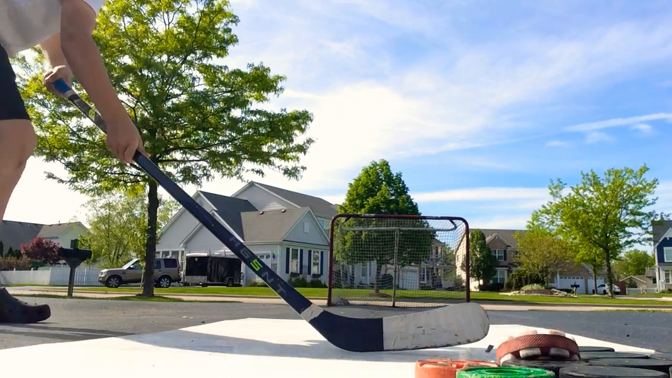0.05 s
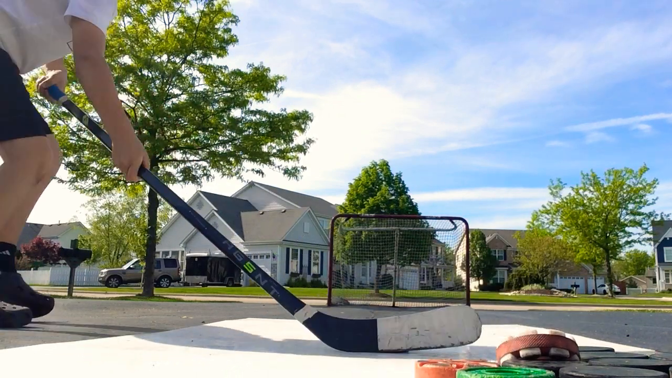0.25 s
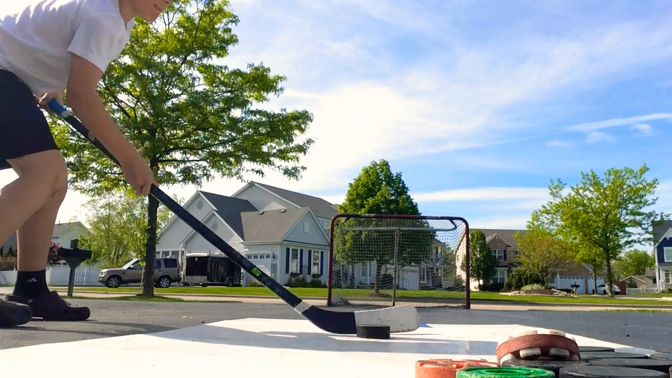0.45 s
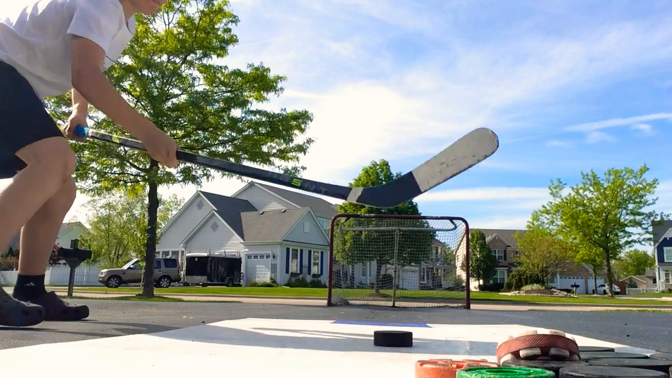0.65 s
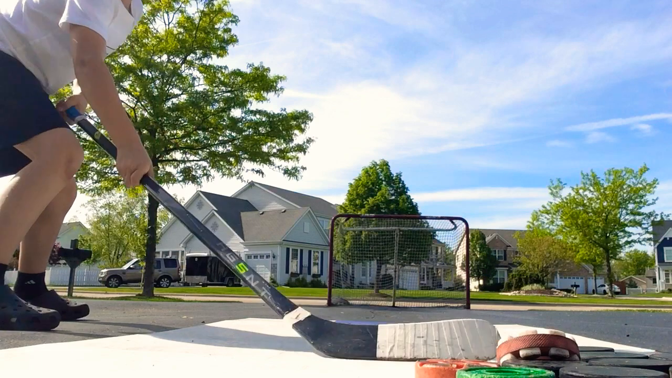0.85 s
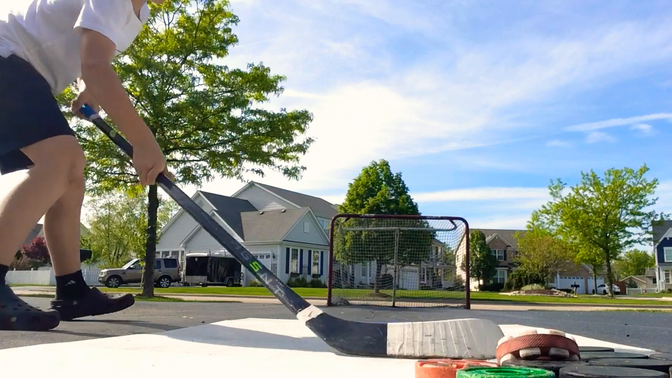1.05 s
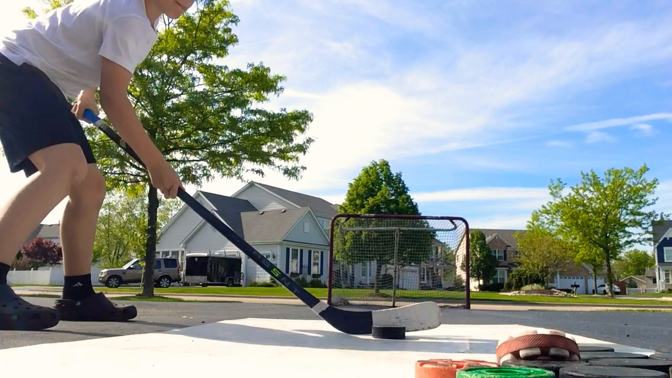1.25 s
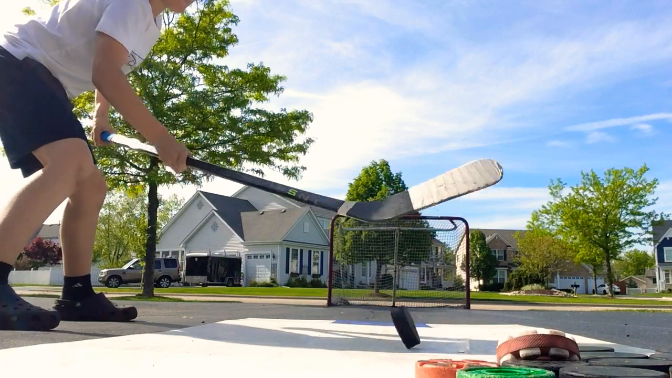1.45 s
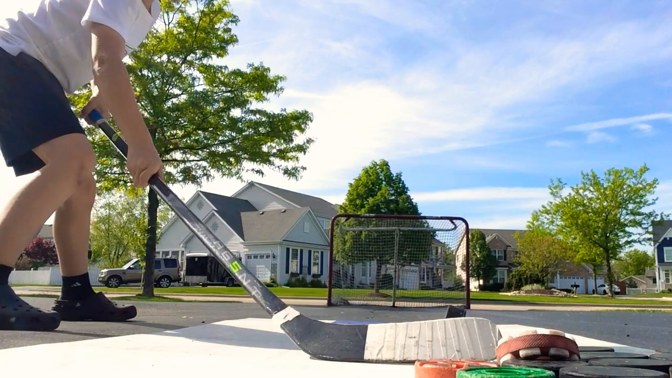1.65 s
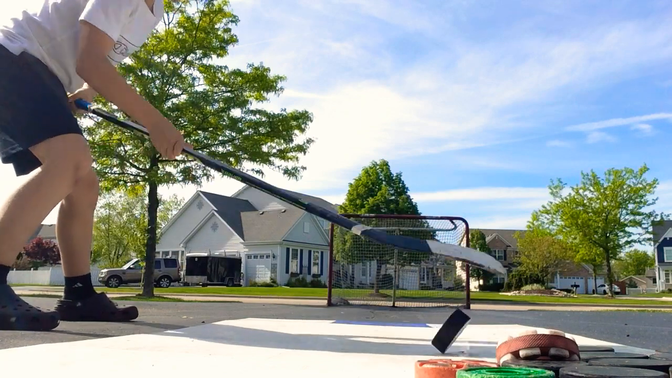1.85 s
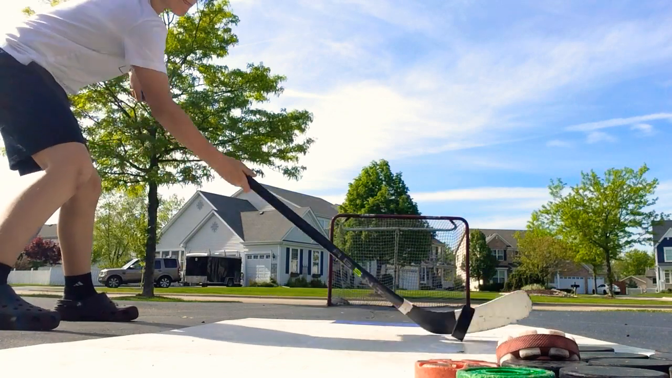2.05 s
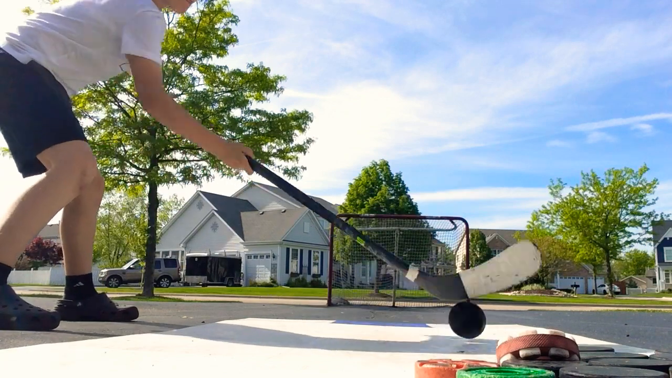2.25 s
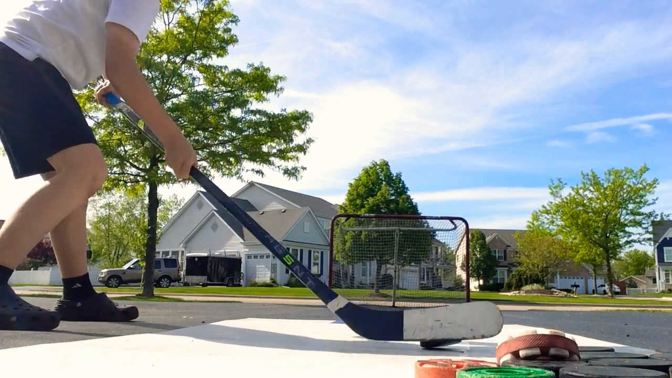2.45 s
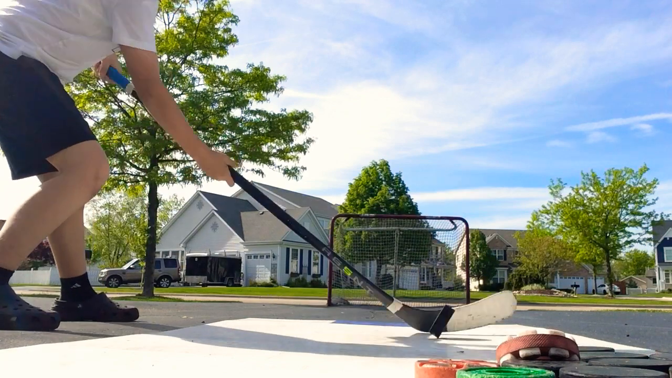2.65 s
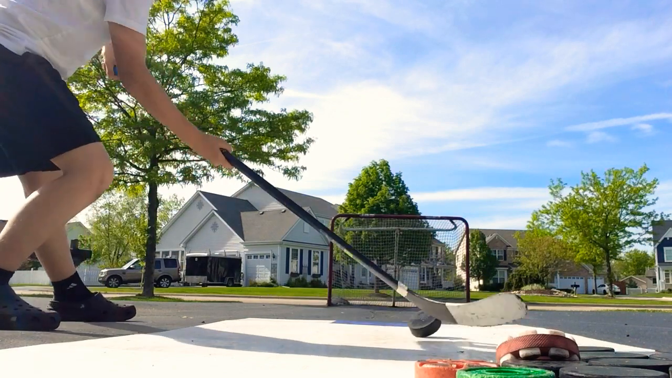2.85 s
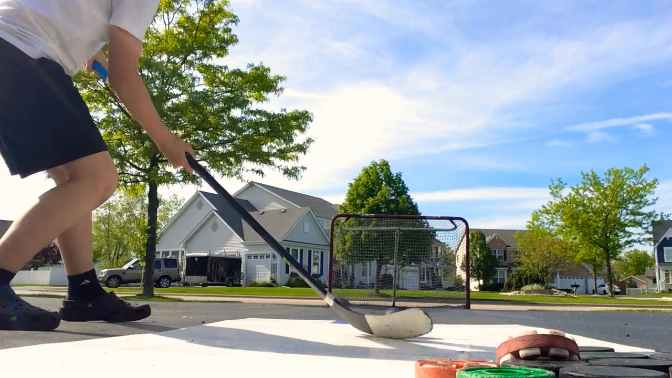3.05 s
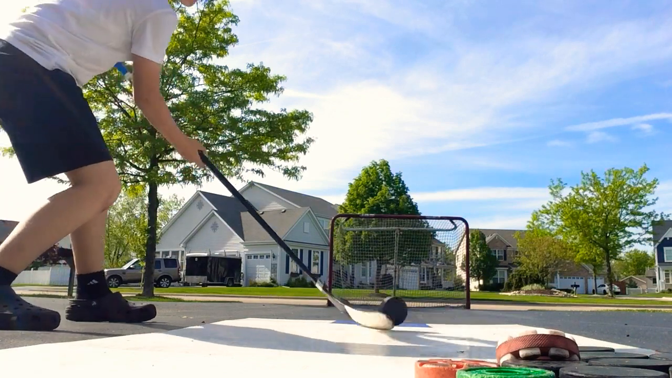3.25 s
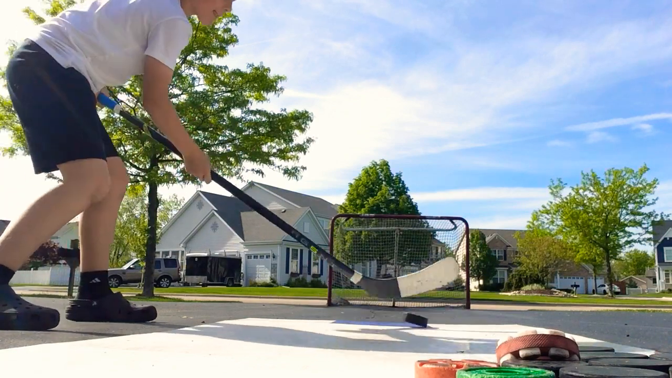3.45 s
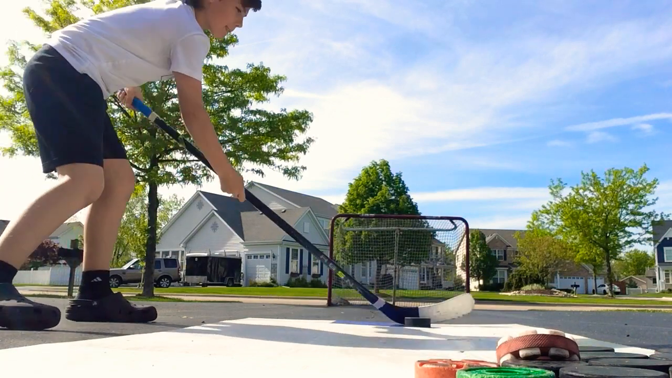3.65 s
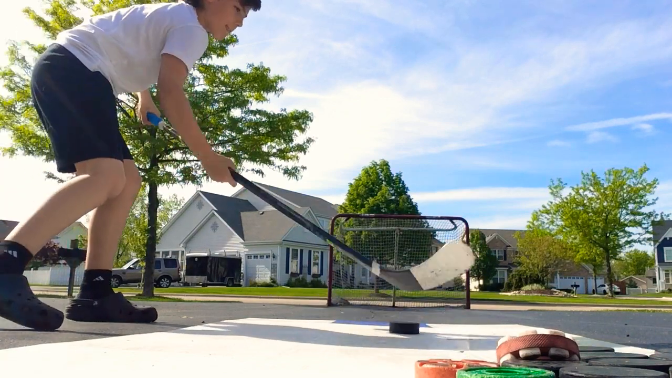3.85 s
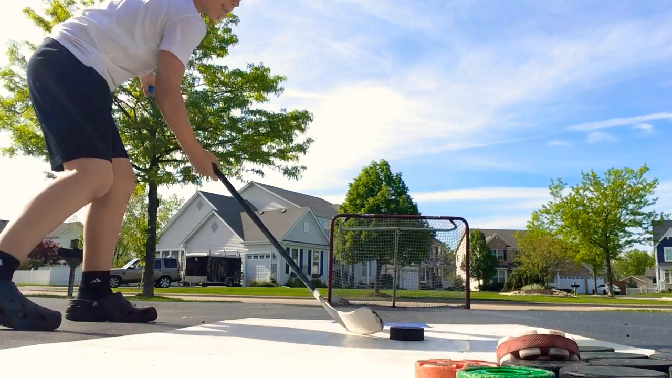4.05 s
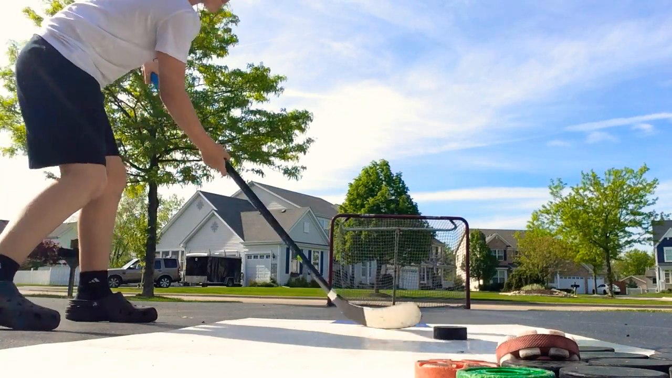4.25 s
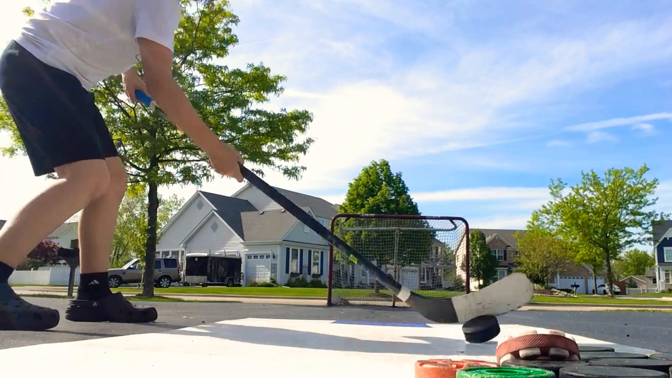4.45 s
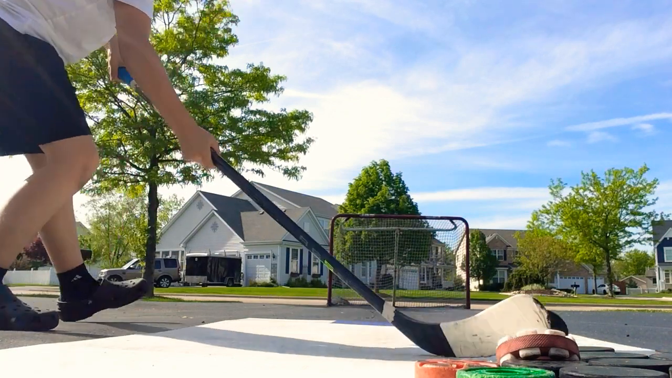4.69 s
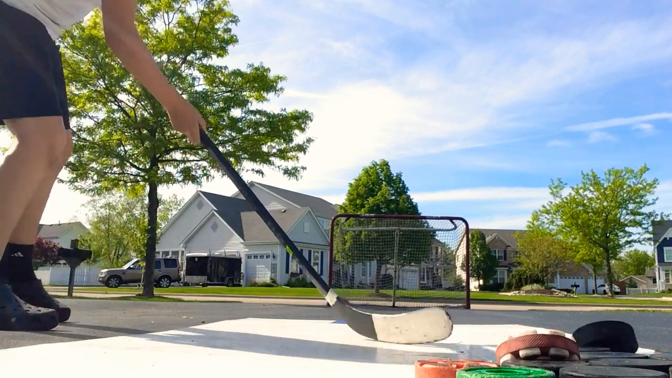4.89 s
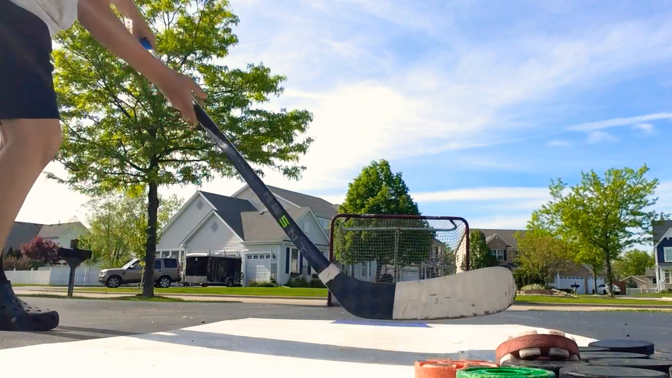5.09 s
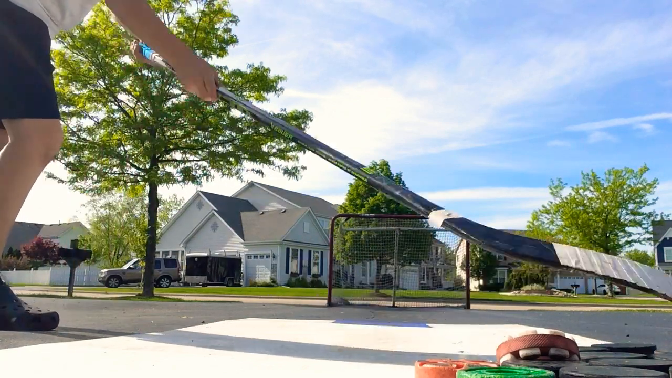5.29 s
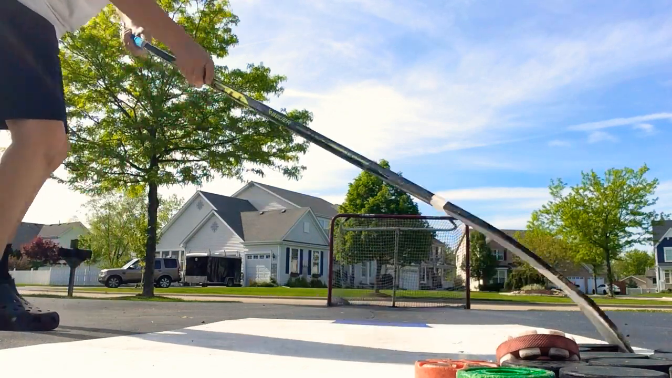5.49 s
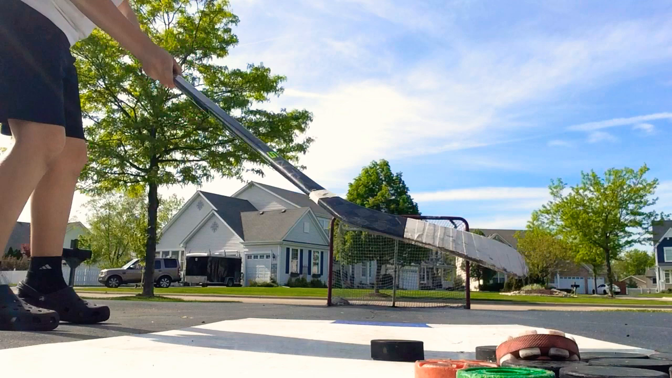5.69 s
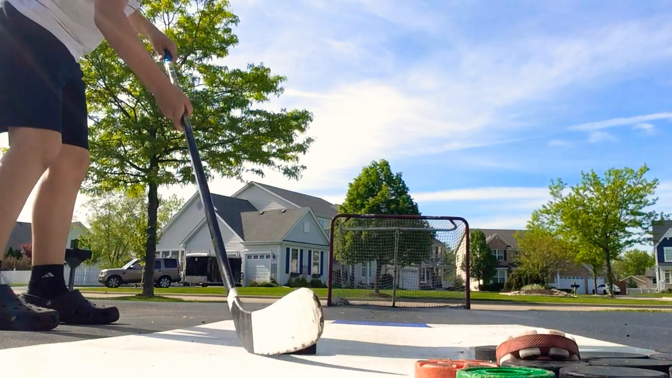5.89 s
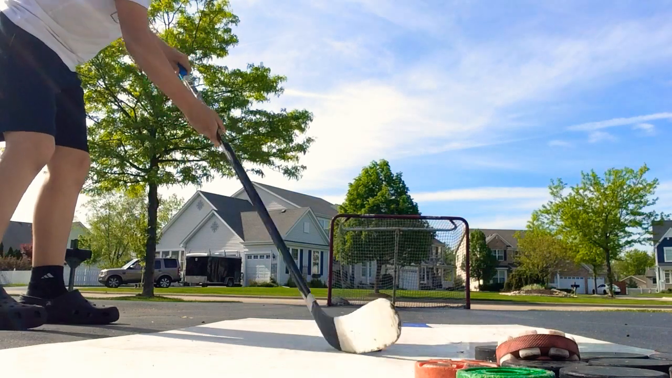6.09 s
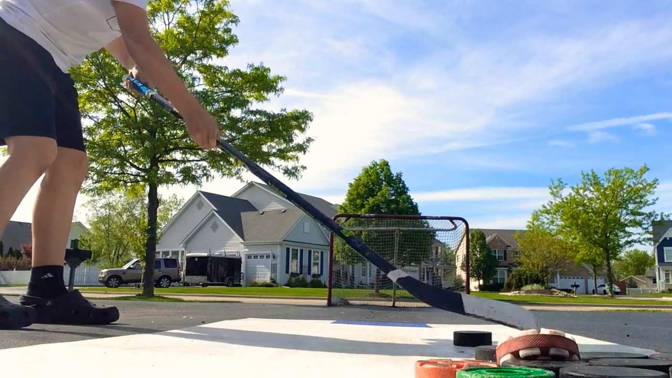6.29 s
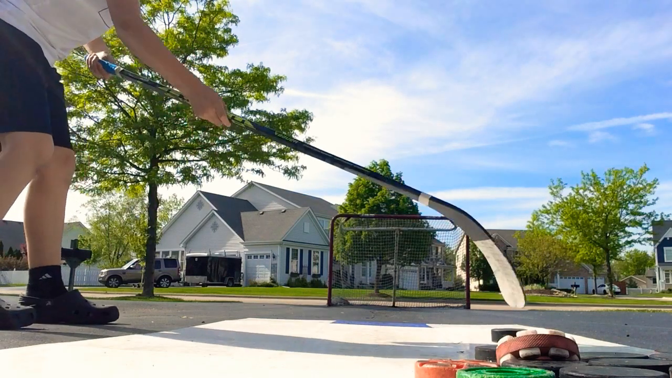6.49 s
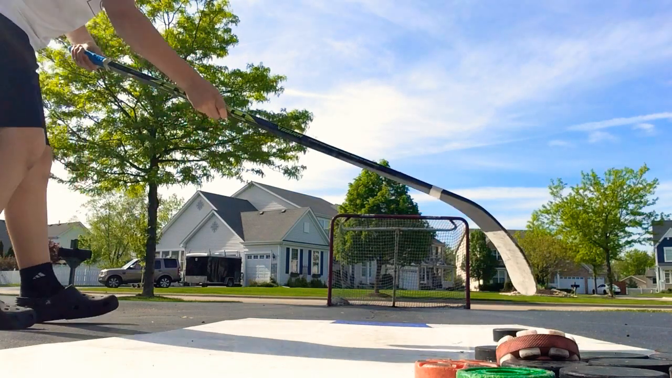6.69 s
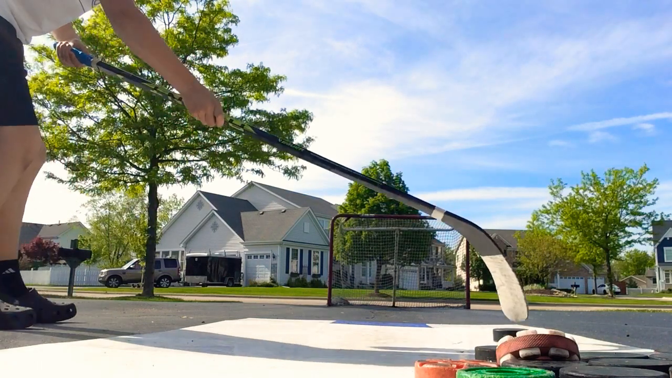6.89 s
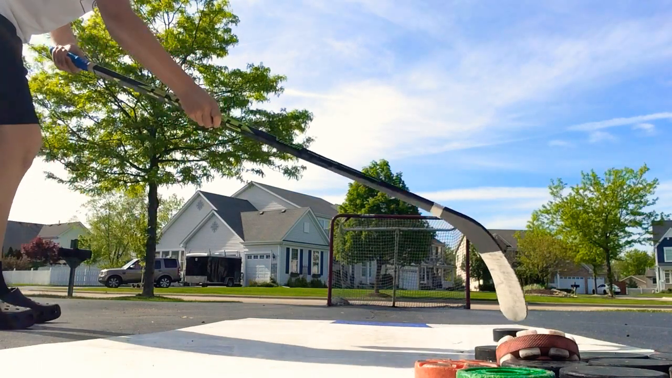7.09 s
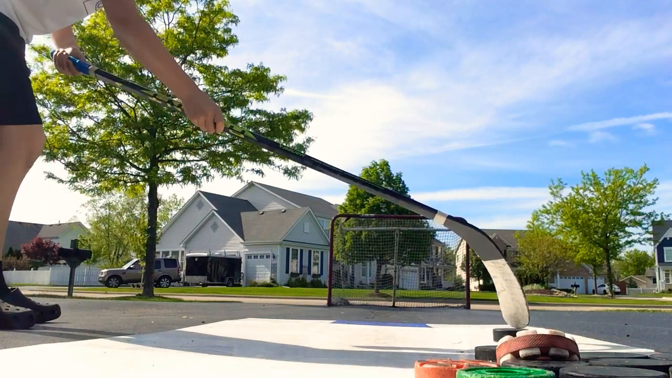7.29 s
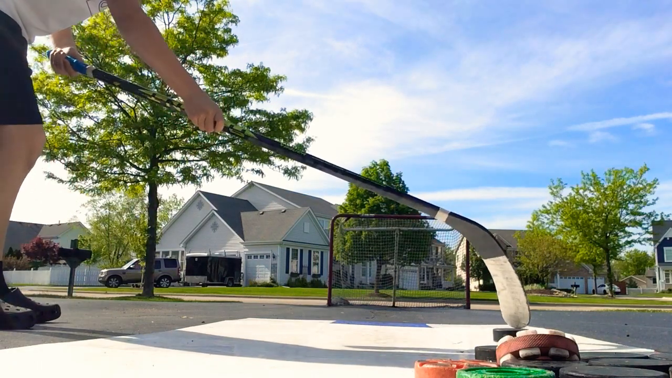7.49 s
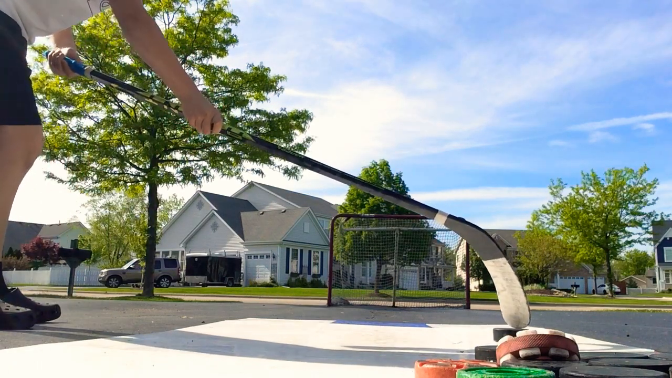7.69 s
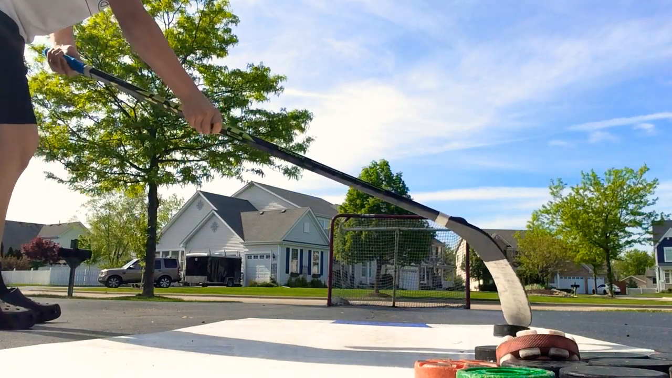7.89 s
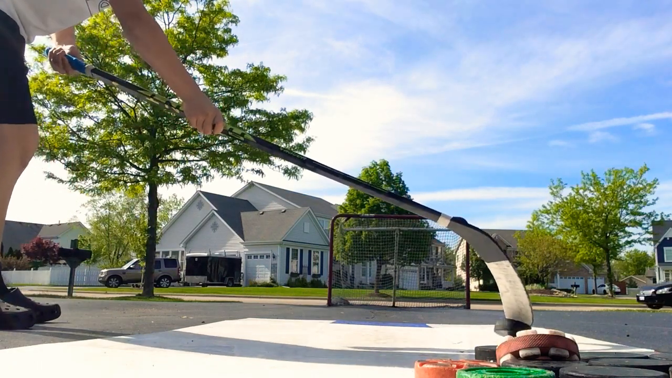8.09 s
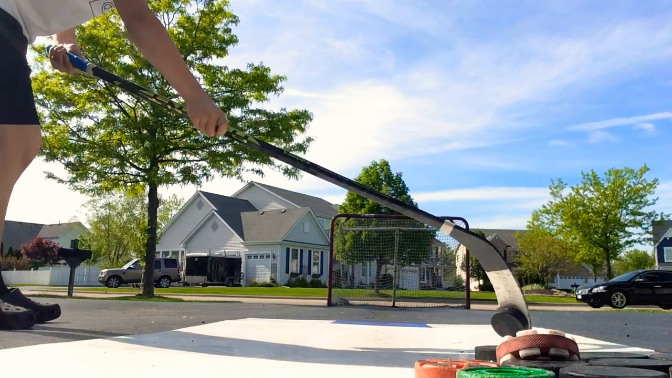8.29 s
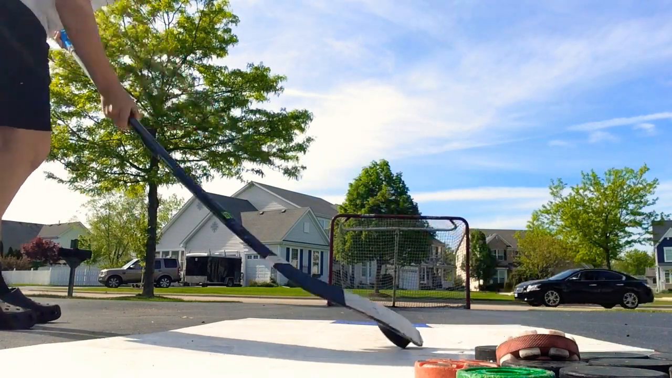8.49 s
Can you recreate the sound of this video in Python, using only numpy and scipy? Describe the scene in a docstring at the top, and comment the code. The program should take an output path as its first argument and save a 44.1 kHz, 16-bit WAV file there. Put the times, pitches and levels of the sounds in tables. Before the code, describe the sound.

Close to the microphone, a taped stick blade raps and flips a rubber puck on a plastic pad over asphalt. Hard hollow clacks, softer thumps and brief gritty scrapes come in quick uneven clusters for six seconds, then thin out. A small shoe squeak follows, then mostly quiet street hum with a tiny bird chirp, and a closing tap as traffic swells.

```python
"""Stick blade and puck on a pad

A stick blade knocks, flips and drags a puck on a plastic pad lying on asphalt, in a quiet street.
Each contact rings pad and blade modes with rattling forces and adds a noise crack; slides are grainy noise.
A shoe squeaks once (tones with uneven slips) and a far bird chirps (falling sines).
Low rumble swells and far traffic, growing towards the end, are shaped noise."""
import sys
import numpy as np
from scipy import signal
from scipy.fft import rfft, irfft
from scipy.io import wavfile

SR = 44100
rng = np.random.default_rng(int(sys.argv[2]) if len(sys.argv) > 2 else 0)


def ratio(d):
    """dB to gain"""
    e = np.asarray(d, float) / 20
    return 10 ** e


def store_wav(level_fs):
    """Save 16-bit WAV to argv[1]."""
    pcm = np.round(np.clip(np.atleast_2d(level_fs), -1, 1) * 32767)
    wavfile.write(sys.argv[1], SR, pcm.T.astype(np.int16))


N = 376613   # samples

# Blade and puck contacts, before the pad's bass cut. Each row: time in seconds, pad thump peak in dB,
# blade knock peak in dB, edge crack peak in dB, pitch centre of the struck spot in Hz.
CONTACTS = [(.033, -21, -51.5, -34, 507), (.106, -3, -5.5, -3.5, 480), (0.121, -14.5, -19.5, -31, 450),
            (.183, -32.5, -39, -45, 497), (0.313, -21, -30, -63, 530), (.331, -24.5, -54, -70, 420),
            (.479, -31.5, -43, -45, 444), (0.537, -7.5, -28, -28, 425), (.554, -9, -10.5, -4.5, 510),
            (0.587, -8, -14.5, -15.5, 556), (.61, -24, -41, -43, 444), (.646, -17.5, -28.5, -27.5, 524),
            (0.736, -14.5, -37.5, -19.5, 453), (.806, -39, -52, -34, 500), (.849, -25.5, -41, -59.5, 570),
            (.899, -9.5, -17.5, -2.5, 480), (0.908, -12.5, -11.5, -11, 470), (1.063, -21, -33.5, -65, 490),
            (1.199, -24, -32.5, -45, 565), (1.23, -21.5, -45, -48.5, 454), (1.267, -18.5, -39, -33.5, 454),
            (1.342, -3, -7, -3, 470), (1.353, -18, -18.5, -14.5, 464), (1.384, -9, -28, -17, 427),
            (1.415, -40, -46, -30, 510), (1.526, -28, -35.5, -54, 580), (1.535, -19, -57.5, -35.5, 545),
            (1.593, -24.5, -48.5, -62, 430), (1.634, -16.5, -27, -28, 580), (1.69, -8.5, -9.5, -7, 596),
            (1.7, -9, -10.5, -6.5, 547), (1.732, -13, -30.5, -25.5, 560), (1.766, -26, -29.5, -35.5, 480),
            (1.781, -30, -35, -50, 457), (1.85, -28.5, -38.5, -37, 377), (2.025, -26.5, -52, -68, 530),
            (2.115, -6.5, -20, -9.5, 490), (2.126, -16.5, -12, -34, 450), (2.212, -25.5, -12, -14, 450),
            (2.222, -20, -39, -51, 415), (2.25, -49, -47, -31.5, 403), (2.27, -26.5, -35, -57, 460),
            (2.325, -13.5, -18.5, -25, 444), (2.478, -0.5, -8.5, -5.5, 480),
            (2.542, -18.5, -28.5, -42, 607), (2.592, -31, -53, -60, 340), (2.668, -29.5, -60, -76, 417),
            (2.764, -6, -11.5, -3, 560), (2.78, -37.5, -30, -19.5, 510), (2.829, -32, -48, -22, 436),
            (2.857, -27.5, -47, -48, 430), (2.889, -35.5, -55, -58, 545), (2.906, -40, -43, -38, 500),
            (2.957, -14, -24.5, -27.5, 525), (3.036, -7, -11, -15.5, 495), (3.199, -21, -30, -49, 505),
            (3.207, -17, -16, -21, 480), (3.394, -29, -55, -74.5, 498), (3.441, -4, -9.5, -10.5, 452),
            (3.478, -43, -52, -46, 534), (3.522, -27.5, -46, -48, 480), (3.618, -17.5, -32.5, -54, 480),
            (3.676, -28, -50.5, -66, 486), (3.752, -2.5, -10, -8, 540), (3.764, -22, -28, -16, 595),
            (3.801, -22.5, -48, -45, 440), (3.811, -33, -45, -24, 480), (3.83, -15.5, -24, -20.5, 580),
            (3.84, -21.5, -48, -19, 480), (3.894, -25, -32, -51, 450), (3.925, -25.5, -39, -55, 420),
            (4.042, -4.5, -11, -6, 546), (4.077, -40, -33, -39, 430), (4.101, -9.5, -12.5, -15, 444),
            (4.116, -20, -48, -41, 470), (4.149, -18, -39, -48, 480), (4.188, -22, -50, -30.5, 796),
            (4.474, -15.5, -9, -24, 405), (4.501, -15, -29, -45, 383), (4.686, -34.5, -41, -63, 403),
            (4.696, -16.5, -36, -44, 420), (4.709, -8.5, -6, -4.5, 594), (4.756, -27, -29, -22.5, 497),
            (4.762, -20.5, -29, -24, 454), (4.876, -23, -34, -44, 480), (4.891, -16, -23.5, -53, 520),
            (4.95, -31, -48, -62, 510), (5.014, -29, -45, -40, 430), (5.201, -22, -34, -52, 620),
            (5.21, -12.5, -21.5, -18.5, 585), (5.275, -24, -39, -48, 470), (5.284, -18, -32, -34.5, 464),
            (5.333, -20.5, -38.5, -67, 433), (5.371, -21, -42, -72, 390), (5.431, -16.5, -50, -50.5, 404),
            (5.439, -14, -17.5, -13, 470), (5.46, -22.5, -42, -29, 460), (5.491, -11, -12, -8.5, 370),
            (5.551, -24.5, -34.5, -57, 368), (5.584, -40, -35, -54, 700), (5.647, -30.5, -51, -57, 356),
            (5.696, -29, -49, -56, 410), (5.743, -32.5, -52, -58, 410), (5.96, -23, -46, -41, 534),
            (5.988, -7, -9, -7.5, 630), (6.011, -21, -27, -43, 480), (6.033, -28, -27, -28.5, 560),
            (6.065, -21, -34.5, -52, 547), (6.242, -37, -35, -44, 440), (6.308, -30.5, -43, -56, 527),
            (6.348, -33.5, -51, -59, 480), (6.468, -22, -24, -58, 504), (6.548, -32, -59, -60, 543),
            (6.714, -61, -52, -37.5, 520), (7.051, -26, -43, -54, 400), (7.374, -21, -36, -42.5, 474),
            (8.339, -28, -13.5, -22, 523), (8.353, -31.5, -53, -53, 426), (8.383, -15.5, -21.5, -17.5, 420),
            (8.423, -30, -52, -56, 540), (8.497, -20.5, -38.5, -36, 423)]
# Pad modes. Each row: frequency in Hz, relative level in dB, t60 in seconds.
PAD_MODES = [(142, -16.5, 0.041), (218.7, -5, 0.096), (295.5, 2, 0.031), (373, -2.5, 0.04),
             (420, -0.5, 0.045), (480, 0.5, 0.034), (552.4, -2, 0.042), (620, -3.5, 0.038),
             (700, 4.5, 0.022), (800, 1, 0.031), (899, 0.5, 0.029)]
# Blade and puck modes, damped alike by tape and rubber. Each row: frequency in Hz, relative level in dB,
# t60 in seconds.
BLADE_MODES = [(hz, level_db, 18 / hz ** .95) for hz, level_db in [(1000, -2.0), (1130, -1.5), (1300, -1.5),
               (1480, -1.5), (1720, -1.5), (1900, -3), (2100, -3), (2330, -4), (2640, -5), (2900, -4),
               (3300, -7), (3800, -8), (4400, -9), (5000, -9)]]
# Crack spectrum ahead of the touch-dependent tilt. Each row: frequency in Hz, relative density in dB.
CRACK_SPECTRUM = [(2000, 7), (3000, 1), (5000, 0.5), (7000, -12), (8200, -24), (10000, -22.5), (14000, -33),
                  (16500, -46.5)]
# House fronts, before smearing and dulling. Each row: lag in seconds, echo level in dB.
ECHOES = [(.034, -27.5), (0.062, -31)]
# Skids and drags over the pad. Each row: start in seconds, length in seconds, hiss level at the start in dB,
# pad rumble level at the start in dB, slowing in dB per second (negative: it grows).
SLIDES = [(0, 6.8, -70.5, -65.5, 0), (0.116, 0.022, -38, -34.5, 100), (0.188, .07, -53, -52, 118),
          (0.293, 0.025, -58, -58, 32), (.36, 0.025, -62, -68, 0), (0.421, 0.16, -50, -52, 56),
          (0.546, 0.078, -43.5, -47, -32), (0.733, .13, -51, -50, 67), (0.899, 0.078, -42.5, -40, 50),
          (1.09, 0.084, -67, -69, -32), (1.2, 0.01, -51, -48, 30), (1.255, 0.11, -56, -54.5, -100),
          (1.355, 0.07, -42, -45, 0), (1.702, 0.053, -41, -32, 96), (1.774, .07, -59, -77, 60),
          (1.91, .18, -114, -52, -41), (2.129, .06, -44, -31, 152), (2.202, .12, -54.5, -42, 87),
          (2.498, 0.055, -37.5, -32, 247), (2.777, 0.097, -43, -39.5, 84), (2.958, .02, -70, -48, -2),
          (3.045, 0.15, -50.5, -44.5, 56), (3.243, 0.31, -65.5, -69, -3), (3.439, 0.081, -59, -40.5, 36),
          (3.644, 0.046, -84, -42, 0), (3.764, 0.098, -48.5, -39.5, 30), (3.85, .18, -52, -62, 27),
          (4.056, .03, -43, -40.5, 100), (4.092, 0.22, -47.5, -52.5, 35), (4.343, .17, -55, -47.5, -16),
          (4.527, .06, -63, -52, 50), (4.62, .08, -76, -57, 4.5), (4.719, 0.048, -40.5, -31, 20),
          (4.8, 0.079, -58, -59.5, -30), (4.884, 0.032, -47.5, -41, -34), (5.22, 0.19, -66, -50, 40),
          (5.487, 0.15, -55, -38, 65), (5.599, 0.31, -48.5, -52, 19), (5.914, 0.11, -56, -52.5, -69),
          (6.04, .14, -57, -56.5, -5), (6.183, 0.3, -50.5, -56, 13), (6.505, 0.059, -59.5, -53, 50),
          (6.903, 0.18, -63.5, -73, 14.5), (8.35, 0.1, -60, -48, 30), (8.47, 0.023, -48.5, -58, 30)]
# Scrape hiss spectrum. Each row: frequency in Hz, relative density in dB.
SCRAPE_SPECTRUM = [(700, -2), (1650, 1.5), (2420, -8), (4000, -4.5), (5080, -3), (6500, -9.5), (8000, -18),
                   (10500, -22), (13800, -28), (16000, -31)]
# Sole on the pad, one curve per part of the squeak. Each row: time in seconds, pitch in Hz,
# level in dB ahead of the overtone gains.
SQUEAK = [
    [(6.11, 2000, -75), (6.125, 2020, -58), (6.14, 2060, -54), (6.155, 2070, -75)],
    [(6.16, 1250, -75), (6.175, 1280, -56), (6.196, 1430, -50), (6.248, 1530, -50), (6.294, 1530, -51),
     (6.32, 1450, -75)],
]
# Far chirps. Each row: start in seconds, start pitch in Hz, end pitch in Hz, peak level in dB.
CHIRPS = [(7.78, 4730, 4380, -72), (7.93, 5540, 5100, -67), (7.98, 5100, 4900, -73)]
# Low rumble swells. Each row: time in seconds, level in dB.
LOW_RUMBLE = [(0, -66.5), (.5, -68), (1.85, -63), (1.95, -49.5), (2.15, -68.5), (3.2, -63.5), (4.0, -71.5),
              (4.7, -57), (5.0, -73.5), (5.6, -59), (6.7, -66.5), (7.6, -58), (8.54, -65.5)]
# Street noise spectrum. Each row: frequency in Hz, relative density in dB.
STREET_SPECTRUM = [(18, -30.5), (30, -21.5), (112, 1), (233, -0.5), (328, -7.5), (499, -10), (584, -10.5),
                   (889, -9), (2610, -29), (4910, -28.5), (7270, -47), (14000, -52), (16000, -63.5)]
# Traffic swell. Each row: time in seconds, level in dB.
TRAFFIC = [(0, -54), (3, -65), (5.1, -60.5), (6.8, -56.5), (7.5, -55), (8.54, -49.5)]

AFTER_S = np.arange(8192) / SR   # time after a contact
PAD_LOW_HZ, MIC_LOW_HZ = 140, 45.0
PEAK_CEILING = .72
# decay constants of the rattle of loose pad and blade after a blow
PAD_CHATTER_S, BLADE_CHATTER_S, CHATTER_SPREAD_DB = 0.011, 0.0079, 1
PUSH_S, PUSH_DB = .0016, -4   # air pulled and pushed as blade and puck meet; dB over the knock
LEAD_S = .0012   # the pad bends under the landing blade before the hard edge snaps
THUD_HZ, THUD_T60_S, THUD_DB = 55.0, .09, -35   # dB over the knock
HISS_RISE_DB_PER_S, HISS_FALL_DB_PER_S = 601.5, 382.5
RUMBLE_RISE_DB_PER_S, RUMBLE_FALL_DB_PER_S = 299.5, 279.5


def in_time(rows, silent_db=-110):
    """Joins curve rows sample by sample; every column takes silent_db outside the table."""
    s, *columns = np.transpose(rows)
    return [np.interp(np.arange(N) / SR, s, c, left=silent_db, right=silent_db) for c in columns]


def coloured(x, spectrum):
    """Shapes the last axis by a (Hz, dB) spectrum, joined over log frequency."""
    size = x.shape[-1]
    hz = np.maximum(np.arange(size // 2 + 1) * SR / size, 1)
    point_hz, point_db = np.transpose(spectrum)
    gain_db = np.interp(np.log(hz), np.log(point_hz), point_db)
    return irfft(rfft(x) * ratio(gain_db), size)


def rms_one(x):
    """Scales to rms 1."""
    return x / np.sqrt(np.mean(x ** 2) + 1e-20)


def drift(rate_hz):
    """Random wander of rms 1: noise through two equal low-pass poles."""
    r = np.exp(-2 * np.pi * rate_hz / SR)
    noise = rng.standard_normal(N + SR)
    return rms_one(signal.lfilter([1], [1, -2 * r, r * r], noise)[SR:])


def ringing(modes, strength_db):
    """Sums decaying sines of random sign into one impulse response per row of mode strengths."""
    hz, level_db, t60_s = np.transpose(modes)[:, :, None]
    decay = ratio(level_db - 60 * AFTER_S / np.maximum(t60_s, .004))
    rings = decay * np.sin(2 * np.pi * hz * AFTER_S)
    signs = rng.choice([-1, 1], strength_db.shape)
    return ratio(strength_db) * signs @ rings


def to_peak(rows, peak_db):
    """Scales each row to its peak."""
    return rows * (ratio(peak_db) / np.abs(rows).max(axis=1))[:, None]


def struck(force, response, peak_db):
    """Drives each response with its force (circular convolution), set to its peak."""
    return to_peak(irfft(rfft(force) * rfft(response), len(AFTER_S)), peak_db)


def contacts():
    """Blows ring the pad near the struck spot's pitch, then blade and puck, and crack at the edge."""
    s, thump_db, knock_db, crack_db, spot_hz = np.transpose(CONTACTS)
    looseness = ratio(CHATTER_SPREAD_DB * rng.standard_normal(len(s)))

    octaves = np.log2(np.array(PAD_MODES)[:, 0] / spot_hz[:, None])
    pad = ringing(PAD_MODES, -14.0 * octaves ** 2 + rng.normal(0, 2.2, octaves.shape))
    pad_force = chatter(PAD_CHATTER_S * looseness, share=.7)
    soft_force = signal.lfilter([1], [1, -1.6, .64], pad_force)   # rubber flattens: no sharp edge
    thump = struck(soft_force, pad, thump_db)

    blade = ringing(BLADE_MODES, rng.normal(0, 2.5, (len(s), len(BLADE_MODES))))
    knock = struck(chatter(BLADE_CHATTER_S * looseness, share=0.52), blade, knock_db)
    push = -np.sin(2 * np.pi * AFTER_S / PUSH_S) * (AFTER_S < PUSH_S)
    knock = knock + ratio(knock_db + PUSH_DB)[:, None] * push

    lead = int(LEAD_S * SR)
    hard = np.pad(knock + edge_crack(crack_db), [(0, 0), (lead, 0)])[:, :len(AFTER_S)]
    out = np.zeros(N + len(AFTER_S))
    for at, row in zip((s * SR).astype(int) - lead, thump + hard):
        out[at:at + len(AFTER_S)] += row
    return out[:N]


def chatter(decay_s, share):
    """A first blow, then an uneven rattle of random blows that dies away."""
    size = (len(decay_s), len(AFTER_S))
    hits = rng.random(size) < 900.0 / SR   # 900 per second
    force = share * rng.standard_normal(size) * hits
    force = force * np.exp(-AFTER_S / np.clip(decay_s, .001, .03)[:, None])
    force[:, 0] = 1
    return force


def edge_crack(crack_db):
    """A snap of about a millisecond, a fizz of grit and a faint tail; light touches are duller."""
    snap = np.exp(-AFTER_S / .0012)
    fizz = ratio(3.5) * np.exp(-AFTER_S / 0.0042)
    tail = ratio(-40.0) * np.exp(-AFTER_S / 0.0079)
    size = len(AFTER_S)
    noise = rng.standard_normal((len(crack_db), size))
    grit = coloured(noise * (snap + fizz + tail), CRACK_SPECTRUM)
    octaves_up = np.log2(np.maximum(np.arange(size // 2 + 1) * SR / size / 3140.0, 1))
    tilt_db_per_octave = 0.35 * (crack_db[:, None] + 25.5)
    crack = irfft(rfft(grit) * ratio(tilt_db_per_octave * octaves_up), size)
    return to_peak(crack * (AFTER_S < .15), crack_db)


def ground():
    """The asphalt carries each knock to the microphone as a low decaying thud."""
    s, _, knock_db, *_ = np.transpose(CONTACTS)
    clicks = np.zeros(N)
    clicks[(s * SR).astype(int)] = ratio(knock_db + THUD_DB + 4.0 * rng.standard_normal(len(s)))
    thud = ringing([(THUD_HZ, 0, THUD_T60_S)], np.zeros((1, 1)))[0]
    return signal.fftconvolve(clicks, thud)[:N]


def houses(x):
    """Dull echoes off the house fronts: delays smeared by decaying noise, then low-passed."""
    out = np.zeros(N)
    for lag_s, echo_db in ECHOES:
        lag = int(lag_s * SR)
        out[lag:] += ratio(echo_db) * x[:-lag]
    smear = rng.standard_normal(1500) * np.exp(-np.arange(1500) / 630.0)
    out = signal.fftconvolve(out, smear / np.linalg.norm(smear))[:N]
    return signal.lfilter([.5], [1, -.5], out)


def sliding():
    """Dense micro-contacts: a grainy hiss, and sparser bumps that set the pad modes rumbling."""
    grain_db = 1.4 * np.minimum(rng.exponential(1, N), 4) + 2.2 * drift(70.0)
    grains = rng.standard_normal(N) * ratio(grain_db)
    hiss = patchy(coloured(grains, SCRAPE_SPECTRUM), patchy_db=2.5)

    hits = rng.random(N) < 500.0 / SR   # 500 per second
    bumps = rng.standard_normal(N) * hits * ratio(2.1 * drift(45.0))
    octaves = np.log2(np.array(PAD_MODES)[:, 0] / 463.0)
    pad = ringing(PAD_MODES, -12.0 * octaves[None] ** 2)[0]
    rumble = rms_one(signal.fftconvolve(bumps, pad)[:N])

    _, _, hiss_db, rumble_db, _ = np.transpose(SLIDES)
    return (strokes(hiss_db, HISS_RISE_DB_PER_S, HISS_FALL_DB_PER_S) * hiss
            + strokes(rumble_db, RUMBLE_RISE_DB_PER_S, RUMBLE_FALL_DB_PER_S) * rumble)


def strokes(level_db, rise_db_per_s, fall_db_per_s):
    """Gain of all slides, added as powers: each swells to its start, changes as it slows, then dies away."""
    power, t = 0, np.arange(0, N + 64, 64) / SR
    for (start_s, length_s, *_, slowing), db in zip(SLIDES, level_db):
        since = t - start_s
        rise = rise_db_per_s * np.maximum(-since, 0)
        slow = slowing * np.clip(since, 0, length_s)
        fall = fall_db_per_s * np.maximum(since - length_s, 0)
        power = power + ratio(db - rise - slow - fall) ** 2
    return np.interp(np.arange(N) / SR, t, np.sqrt(power))


def patchy(x, patchy_db):
    """Every band flickers on its own as the rubbing surfaces shift."""
    edges_hz = np.geomspace(600, 17000, num=9)
    out = 0
    for k, edge_hz in enumerate(zip(edges_hz, edges_hz[1:])):
        band = signal.sosfilt(signal.butter(2, edge_hz, "band", fs=SR, output="sos"), x)
        out = out + (-1) ** k * ratio(patchy_db * drift(25.0)) * band
    return rms_one(out)


def shoe():
    """Stick-slip of rubber: uneven slips blur a tone and its weak half-step overtones."""
    out = 0
    for part in SQUEAK:
        hz, level_db = in_time(part)
        # every second slip is weaker: lines half a pitch apart
        half_phase = np.pi * np.cumsum(hz * (1 + .02 * drift(150))) / SR
        for order, overtone_db in [(2, 2), (3, -6), (4, -6)]:   # order 2 is the pitch itself
            gain = ratio(level_db + overtone_db) * (1 + .4 * drift(90))
            out = out + gain * np.sin(order * half_phase)
    return out


def bird():
    """Short falling whistles from a far tree: swept sines under a Hann window."""
    size = int(0.0443 * SR)
    out = np.zeros(N)
    for s, start_hz, end_hz, level_db in CHIRPS:
        phase = 2 * np.pi * np.cumsum(np.linspace(start_hz, end_hz, size)) / SR
        out[int(s * SR):][:size] += ratio(level_db) * np.hanning(size) * np.sin(phase)
    return out


def low_rumble():
    """Lumpy low rumble: band-passed noise under the rumble curve."""
    level_db, = in_time(LOW_RUMBLE)
    band = signal.butter(2, [52.0, 110.0], "band", fs=SR, output="sos")
    lumps = signal.sosfilt(band, rng.standard_normal(N))
    return ratio(level_db + 1.0 * drift(7.6)) * rms_one(lumps)


def street():
    """Distant traffic and leaves as shaped noise, swelling as a car draws near."""
    level_db, = in_time(TRAFFIC)
    noise = rms_one(coloured(rng.standard_normal(N), STREET_SPECTRUM))
    return ratio(level_db + 0.43 * drift(2.2)) * noise


def scene():
    """All sources at the microphone; the thin pad radiates little deep bass."""
    bass_cut = signal.butter(3, PAD_LOW_HZ, "high", fs=SR, output="sos")
    near = signal.sosfilt(bass_cut, contacts())
    mix = near + houses(near) + ground() + sliding() + shoe() + bird() + low_rumble() + street()
    return mix[None]


def top_cut(x):
    """Nothing passes above the cut-off."""
    return signal.sosfilt(signal.butter(12, 16980, fs=SR, output="sos"), x)


def record(dry):
    """The loudest peaks are rounded off; the top octave and the deep bass fade."""
    rounded = PEAK_CEILING * np.tanh(dry / PEAK_CEILING)
    dulled = signal.sosfilt(signal.butter(6, 15000.0, fs=SR, output="sos"), rounded)
    finished = signal.sosfilt(signal.butter(2, MIC_LOW_HZ, "high", fs=SR, output="sos"), dulled)
    return top_cut(finished)


dry = scene()
out = record(dry)
store_wav(out)
```